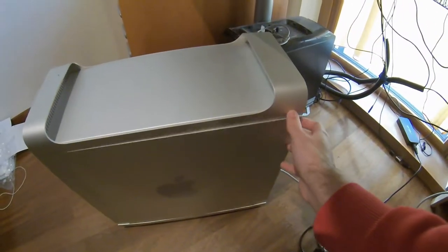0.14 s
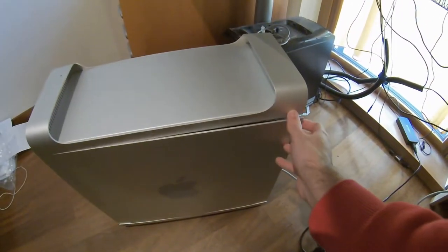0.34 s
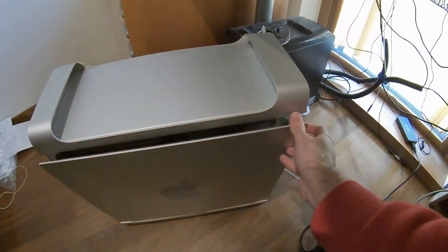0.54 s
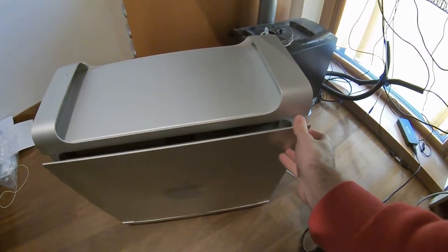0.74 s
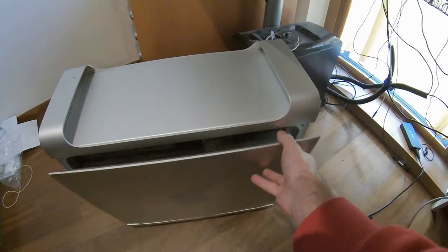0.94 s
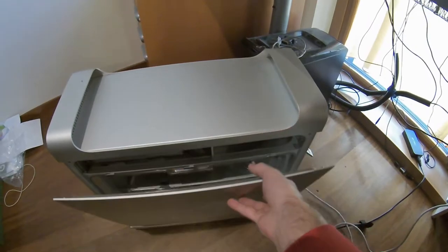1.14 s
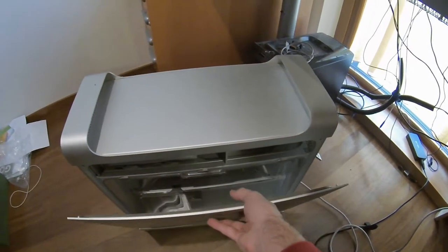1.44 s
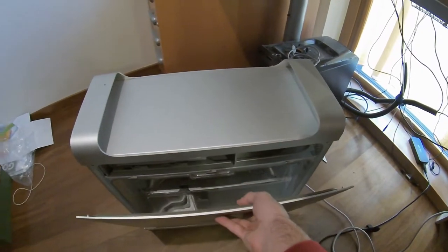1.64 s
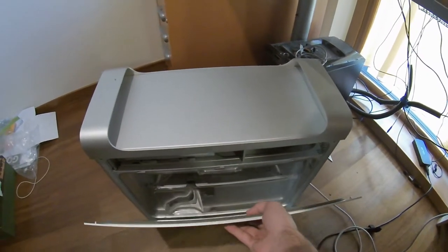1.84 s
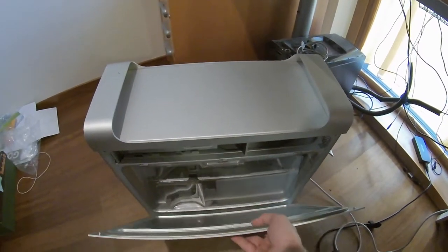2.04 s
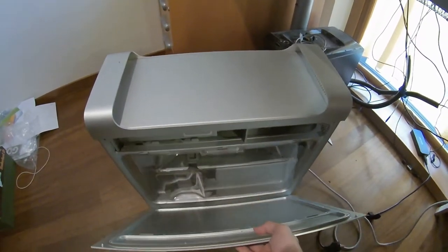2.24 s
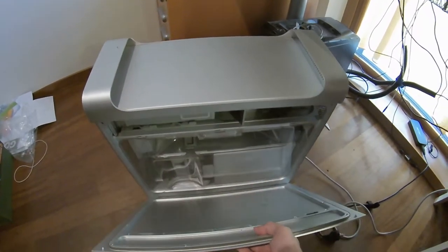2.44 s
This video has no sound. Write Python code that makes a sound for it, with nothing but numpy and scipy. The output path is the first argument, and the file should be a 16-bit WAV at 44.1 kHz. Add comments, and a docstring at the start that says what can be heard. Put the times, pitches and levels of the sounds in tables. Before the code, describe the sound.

Metal panel snapping and scraping loose from a computer case, followed by light clicks and a knock.

```python
"""A release lever slides with a thin hiss: the aluminium side panel of a computer tower is unlatched.
Its edge scrapes free and the catches snap past one after another; the case booms and the sheet rings.
A hand slides along the panel, which ticks as it tilts and knocks on its lower edge.
A thin whistle follows. Under it all lie the air of a small room and a faint electrical whine."""
import sys
import numpy as np
from scipy import signal
from scipy.fft import rfft, irfft
from scipy.io import wavfile

SR = 44100
rng = np.random.default_rng(int(sys.argv[2]) if len(sys.argv) > 2 else 0)


def digitize_waveform(pressure):
    """Quantize a signal to 16-bit integers and store it at the path in sys.argv[1].

    Rows of a 2-D input are taken as channels; values are limited to [-1, 1].
    """
    field = np.atleast_2d(pressure).T
    bounded = np.clip(field, -1, 1)
    quanta = np.round(bounded * 32767).astype(np.int16)
    wavfile.write(sys.argv[1], SR, quanta)


N = 114660
T = np.arange(N) / SR
BIN_HZ = np.arange(N // 2 + 1) * SR / N


def from_db(db):
    """Decibels to gain."""
    return 10 ** (np.asarray(db) / 20)


def unit_power(x):
    """Scale to unit power."""
    return x / np.sqrt(np.mean(x ** 2) + 1e-20)


def fader(points):
    """Gain ride through (time, level) breakpoints."""
    return from_db(np.interp(T, *np.transpose(points)))


def at_hz(table, hz, column=1):
    """Read a column of a table on a log-frequency axis."""
    table = np.array(table)
    return np.interp(np.log(np.maximum(hz, 1)), np.log(table[:, 0]), table[:, column])


def colour(x, eq, tilt_db=0):
    """EQ a steady excitation and tilt it per octave from 1 to 10 kHz; unit power."""
    octaves = np.log2(np.clip(BIN_HZ, 1000, 10000))
    return unit_power(irfft(rfft(x) * from_db(at_hz(eq, BIN_HZ) + tilt_db * octaves), N))


def slips(per_s, spread_db):
    """Friction grain: random tiny slips of uneven size."""
    sizes = from_db(spread_db * np.minimum(rng.exponential(1, N), 4)) * rng.choice([-1, 1], N)
    return sizes * (rng.random(N) < per_s / SR)


def narrow_noise(hz, width_hz):
    """Noise twice through one resonance; unit power."""
    radius = np.exp(-np.pi * width_hz / SR)
    poles = [1, -2 * radius * np.cos(2 * np.pi * hz / SR), radius * radius]
    x = rng.standard_normal(2 * N)
    for _ in range(2):
        x = signal.lfilter([1, 0, -1], poles, x)
    return unit_power(x[N:])


def hit(start, t60, hold=0):
    """Envelope: hard attack, hold, exponential decay."""
    return (T >= start) * np.exp(-np.log(1000) * np.clip((T - start - hold) / t60, 0, 10))


def stroke(start, length, attack_s, release_s):
    """Envelope: soft attack, hold, soft release."""
    return np.clip((T - start) / attack_s, 0, 1) * np.exp(-np.maximum(T - start - length, 0) / release_s)


def struck(modes, uneven_db=2):
    """One second of clear modes, each struck with a strength of its own."""
    t, out = T[:SR], 0
    for hz, db, t60 in modes:
        gain = from_db(db + uneven_db * rng.normal())
        out += gain * np.sin(2 * np.pi * (hz * t + rng.random())) * np.exp(-np.log(1000) * t / t60)
    return out


def dense_ring(table):
    """One second of crowded modes: half-octave noise bands, each with its decay; starts at unit power."""
    edges = 30 * 2 ** (np.arange(19) / 2)
    white, out, power = rng.standard_normal((2, SR)), 0, 0
    for k, (low, high) in enumerate(zip(edges, edges[1:])):
        hz = np.sqrt(low * high)
        bandpass = signal.butter(2, [low, high], "band", fs=SR, output="sos")
        band = from_db(at_hz(table, hz)) * signal.sosfilt(bandpass, white[k % 2])
        out += band * np.exp(-np.log(1000) * T[:SR] / at_hz(table, hz, column=2))
        power += np.mean(band ** 2)
    return out / np.sqrt(power)


def add(out, start, sound):
    """Mix a sound in at a time."""
    i = int(start * SR)
    out[i:i + len(sound)] += sound[:N - i]


# EQ of the room air: (f/Hz, level/dB)
AIR_EQ = [(20, -14.5), (30, -8), (38, -13.5), (50, -12), (74, -17.5), (114, -21), (164, -23.5), (241, -26),
          (373, -29.5), (500, -31), (1000, -36), (2000, -39), (4500, -42.5), (6500, -44), (9000, -38.5),
          (11000, -45), (14000, -47)]
def room_tone():
    """The bed: room air, a very deep rumble and a faint electrical whine."""
    air = from_db(-55.5) * colour(rng.standard_normal(N), AIR_EQ)
    rumble = from_db(-45.5) * narrow_noise(hz=9.496, width_hz=2.66)
    whine = from_db(-74.5) * narrow_noise(hz=9650, width_hz=120)
    return air + rumble + whine


# pitch and level ride of the whistle: (t/s, f/Hz, level/dB)
WHISTLE_ARC = [(2.35, 7650, -85), (2.395, 7800, -73), (2.43, 8200, -60.5), (2.47, 8210, -63.5),
               (2.511, 8380, -62), (2.54, 8500, -61), (2.56, 8000, -66), (2.585, 7520, -70.5),
               (2.6, 7500, -82)]
def whistle(waver=0.35, jitter_hz=35):
    """A thin, slightly unsteady tone arches up and down."""
    times, hz, db = np.transpose(WHISTLE_ARC)
    flutter = 1 + waver * narrow_noise(30, 60)
    level = from_db(np.interp(T, times, db)) * (T > times[0]) * flutter
    pitch = np.interp(T, times, hz) + jitter_hz * narrow_noise(80, 160)
    return np.sqrt(2) * level * np.sin(2 * np.pi * np.cumsum(pitch) / SR)


# cues for skin on metal: (t/s, length/s, level/dB, tilt/dB per octave)
RUB_CUES = [(0.951, 0.023, -53, 1.5), (1.02, 0.087, -57, 3.5), (1.145, 0.14, -57.5, 2.5),
            (1.299, 0.095, -59.5, 4), (1.379, 0.074, -57, 2.5), (2.279, 0.02, -47.5, -4)]
# airy EQ of a rub: (f/Hz, level/dB)
RUB_EQ = [(500, -7), (2400, -11.5), (3000, -3), (3500, -6), (4200, -2.5), (5200, -9.5), (7500, -4.5),
          (8500, 2), (9500, -2), (10500, -11), (13500, -16.5)]
def hand_rubs():
    """Fingers hiss over the metal in fine slips."""
    out = np.zeros(N)
    for start, length, db, tilt_db in RUB_CUES:
        hiss = colour(slips(per_s=6000, spread_db=1.5), RUB_EQ, tilt_db)
        out += from_db(db) * stroke(start, length, attack_s=0.015, release_s=0.041) * hiss
    return out


# cues for soft shifts: (t/s, length/s, level/dB)
SHIFT_CUES = [(0.188, 0.019, -55), (0.216, 0.027, -52.5), (0.277, 0.017, -62), (0.86, 0.098, -65.5),
              (2.236, 0.032, -63.5)]
# muffled EQ of a shift: (f/Hz, level/dB)
SHIFT_EQ = [(80, -2), (230, -10), (330, 8.5), (480, -4), (610, -2), (700, -12), (1100, -14.5),
            (1600, -15.5), (4000, -34)]
def shifts():
    """The loose panel and the lever shift dully in sparse slips."""
    level = sum(from_db(db) * stroke(start, length, attack_s=0.0027, release_s=0.024)
                for start, length, db in SHIFT_CUES)
    return level * colour(slips(per_s=600, spread_db=1.5), SHIFT_EQ)


# level ride of the lever's slide: (t/s, level/dB)
LEVER_RIDE = [(0.11, -91), (0.135, -62.5), (0.162, -59.5), (0.18, -49.5), (0.192, -52.5), (0.21, -62),
              (0.27, -98)]
# resonances of the lever: (f/Hz, width/Hz, relative level/dB)
LEVER_PEAKS = [(2740, 510, -2), (3460, 280, 0), (4130, 720, -1.5), (5980, 2300, 6), (6230, 380, -11),
               (8340, 1500, 1.5)]
def lever():
    """Friction of the sliding release lever sings in a few broad resonances."""
    friction = sum(from_db(db) * narrow_noise(hz, width) for hz, width, db in LEVER_PEAKS)
    return fader(LEVER_RIDE) * unit_power(friction)


# cues for the lower edge: (t/s, crack/dB, tilt/dB per octave, groove ring/dB, tail/dB, case knock/dB)
TICK_CUES = [(0.856, -63, -16, -67, -59, -60), (0.9057, -46, -1.5, -51, -53, -62),
             (0.9446, -51, -4, -55.5, -54.5, -72), (2.086, -58, 19, -80, -76, -85),
             (2.3022, -32.5, -1.5, -45, -45, -46.5), (2.3146, -48, -13, -56, -48.5, -43.5)]
# EQ of a tick's crack: (f/Hz, level/dB)
TICK_EQ = [(300, -14), (1500, -6), (2300, 0), (2950, 8.5), (3400, -2), (4200, 6), (5200, -9.5), (6600, 0),
           (8700, 1.5), (10500, -19.5), (14000, -28)]
# bright modes of the groove: (f/Hz, level/dB, t60/s)
GROOVE_MODES = [(1750, -9, .08), (2530, -4, .07), (3020, -3, .06), (3720, -2, .06), (4400, -3, .05),
                (6550, -6, .04)]
# hollow modes of the knocked case: (f/Hz, level/dB, t60/s)
CASE_MODES = [(251, 0, 0.17), (391, 1, 0.12), (445, -0.5, 0.09), (695, -6, .17), (864, -2.5, 0.091),
              (1035, -13, .14), (1570, -9, 0.14)]
# dense tail of a tick: (f/Hz, level/dB, t60/s)
TAIL_BANDS = [(100, -22, 0.81), (350, 8, 0.35), (560, 3, 0.36), (800, 6, 0.24), (1700, 9, 0.2),
              (3500, 0, 0.29), (6000, -1, 0.27), (8400, -10, 0.15), (11000, -29, .15), (14000, -26, .15)]
def edge_ticks(knock_rise_s=0.0024):
    """The tilting panel jumps in its groove with a snap and a short crack, and knocks the case."""
    out = np.zeros(N)
    for start, crack_db, tilt_db, groove_db, tail_db, knock_db in TICK_CUES:
        snap = from_db(0.5) * hit(start, t60=0.0039)  # first instant of contact
        envelope = snap + hit(start, t60=0.039)
        out += from_db(crack_db) * envelope * colour(rng.standard_normal(N), TICK_EQ, tilt_db)
        knock = from_db(knock_db) * struck(CASE_MODES) * (1 - np.exp(-T[:SR] / knock_rise_s))
        groove = from_db(groove_db) * struck(GROOVE_MODES)
        tail = from_db(tail_db) * dense_ring(TAIL_BANDS)
        add(out, start, knock + groove + tail)
    return out


# low end of the case: (t/s, f/Hz, level/dB, t60/s)
BOOM_CUES = [(0.504, 54.74, -38.5, 1.16), (2.315, 148.8, -49, 0.6)]
def case_booms(rise_s=0.016):
    """Low modes of the case swell and die away."""
    out = np.zeros(N)
    for start, hz, db, t60 in BOOM_CUES:
        envelope = hit(start, t60) * np.clip((T - start) / rise_s, 0, 1)
        out += from_db(db) * envelope * np.sin(2 * np.pi * hz * (T - start))
    return out


# dense wash of sheet, case and room: (f/Hz, level/dB, t60/s)
SHEET_BANDS = [(100, 7.5, 0.53), (347, 2.5, .45), (560, 0, 0.49), (850, 2, 0.33), (1500, -6.5, 0.62),
               (2500, 2.5, 0.27), (4000, -6.5, 0.49), (6000, 1, 0.31), (8500, -6, 0.36),
               (10700, -26.5, 0.31), (14000, -30, 0.13)]
# clear modes of the panel: (f/Hz, level/dB, t60/s)
PANEL_MODES = [(332, -14, .55), (424, -13, .45), (849, -14, .4), (1367, -16, .4), (1963, -18, .4),
               (2379, -19, .35), (3063, -20, .4), (3520, -15, .3), (3935, -15, .35), (4139, -17, .35),
               (5150, -15, .3), (7127, -18, .24), (8310, -19, .2), (8680, -17, .22)]
def panel_ring():
    """The sheet's answer to one blow: clear modes over the crowded ones."""
    return dense_ring(SHEET_BANDS) + struck(PANEL_MODES)


# pressure of the scraping edge: (t/s, level/dB)
PRESSURE_RIDE = [(0.47, -72), (0.492, -44), (0.51, -32.5), (0.53, -40), (0.555, -34), (0.578, -41),
                 (0.6, -41.5), (0.618, -48.5), (0.65, -50), (0.76, -74), (0.8, -100)]
# EQ of the scrape: (f/Hz, level/dB)
SCRAPE_EQ = [(40, -2), (70, 7), (120, -5), (240, 5.5), (400, 8.5), (560, -2), (850, 2), (1600, -1.5),
             (3000, -6.5), (5000, -11), (7000, -4.5), (8600, 2.5), (10500, -16), (14000, -38)]
def edge_scrape(ring_db=-8):
    """The edge drags out of its seat in dense slips that also ring the sheet."""
    pressure = fader(PRESSURE_RIDE)
    grains = unit_power(slips(per_s=5000, spread_db=2))
    ring = panel_ring()
    ringing = signal.fftconvolve(pressure * grains, ring / np.linalg.norm(ring))[:N]
    return pressure * colour(grains, SCRAPE_EQ) + from_db(ring_db) * ringing


# resonances of the latch rail: (f/Hz, width/Hz, boost/dB)
RAIL_PEAKS = [(3614, 195, 10), (3990, 170, 9.5), (4450, 140, 4), (4820, 120, 6.5), (5140, 220, 4.5),
              (5970, 220, 7.5), (6750, 230, 6.5), (7800, 200, 5.5), (8530, 400, 5), (9150, 270, 5)]
# EQ of a catch's crack: (f/Hz, level/dB)
CRACK_EQ = [(300, -11), (1500, -6), (2400, -2), (3100, -2.5), (3600, -3.5), (5200, -0.5), (7000, -5),
            (9000, -4), (10500, -13.5), (14000, -30)]
def rail_grind(tilt_db):
    """Metal grinds on metal, coloured by the rail's resonances; unit power."""
    boost_db = sum(db / (1 + (2 * (BIN_HZ - hz) / width) ** 2) for hz, width, db in RAIL_PEAKS)
    grains = slips(per_s=14000, spread_db=5)
    return colour(irfft(rfft(grains) * from_db(boost_db), N), CRACK_EQ, tilt_db)


# cues for the catches:
# (t/s, crack/dB, tilt/dB per octave, grind/s, sheet ring/dB, thud/dB, ping f/Hz, ping level/dB)
CATCH_CUES = [(0.4915, -62, -2, .001, -62, -43, 2600, -62),
              (0.5030, -33.5, 15, 0.0034, -42.5, -47, 6740, -33),
              (0.5335, -29.5, 2, 0.0022, -41.5, -48, 4800, -54),
              (0.5372, -26.5, 6, .003, -39.5, -54, 4770, -29),
              (0.5810, -23.5, 2, 0.0024, -39.5, -50, 3650, -31.5),
              (0.6282, -29.5, 2, .002, -45.5, -62, 4870, -38),
              (0.684, -48.5, -6.5, 0.0043, -60, -60, 3090, -46.5),
              (0.7288, -47.5, -5, 0.0022, -64, -52.5, 4700, -51)]
# dull body of a blow: (f/Hz, level/dB, t60/s)
THUD_BANDS = [(40, -24, 0.24), (130, -1, 0.18), (254, 4, 0.3), (425, -0.5, 0.29), (550, -43, 0.067),
              (840, -4, 0.32), (1400, -9, 0.078), (2930, -25, 0.042), (9000, -45, .1)]
def catches(crack_t60_s=0.024, ping_t60_s=0.045, thud_rise_s=0.015):
    """Each catch grinds for a moment, cracks free with a ping and sets the sheet and the case ringing."""
    out = np.zeros(N)
    for start, crack_db, tilt_db, grind_s, ring_db, thud_db, ping_hz, ping_db in CATCH_CUES:
        out += from_db(crack_db) * hit(start, crack_t60_s, hold=grind_s) * rail_grind(tilt_db)
        ring = from_db(ring_db) * panel_ring()
        thud = from_db(thud_db) * dense_ring(THUD_BANDS) * (1 - np.exp(-T[:SR] / thud_rise_s))
        ping = struck([(ping_hz, ping_db, ping_t60_s)])
        add(out, start, ring + thud + ping)
    return out


def scene():
    """The mono mix, as at one close microphone."""
    unlatching = lever() + catches() + case_booms() + edge_scrape()
    handling = edge_ticks() + hand_rubs() + shifts()
    return (unlatching + handling + whistle() + room_tone())[None]


def record(dry):
    """A steep high cut at 13.9 kHz."""
    return signal.sosfilt(signal.ellip(10, .3, 70, 13900, fs=SR, output="sos"), dry)


dry = scene()
out = record(dry)
digitize_waveform(out)
```